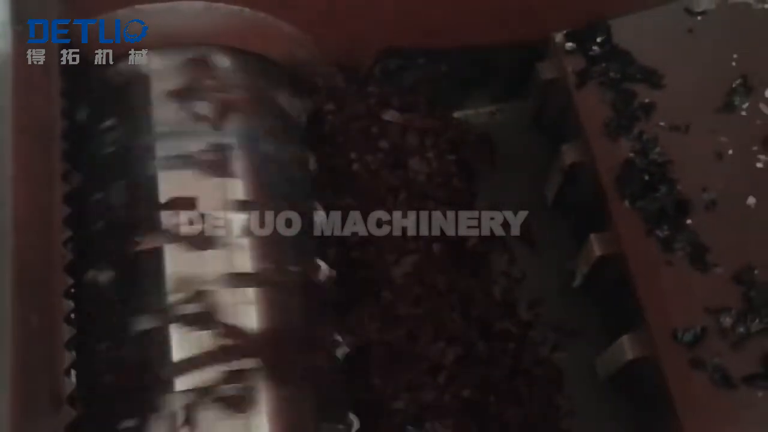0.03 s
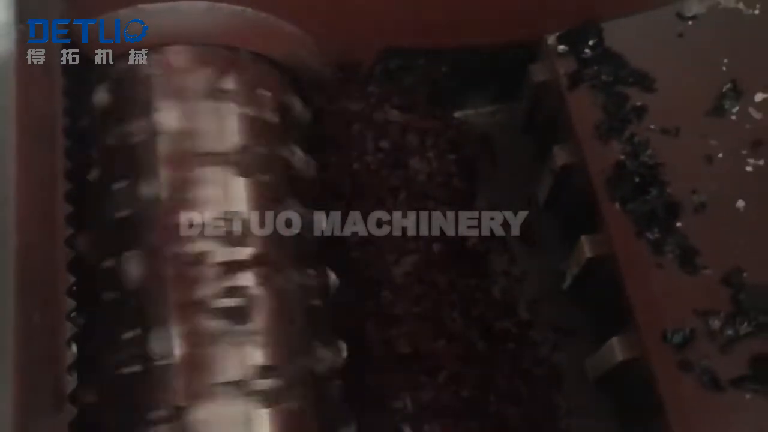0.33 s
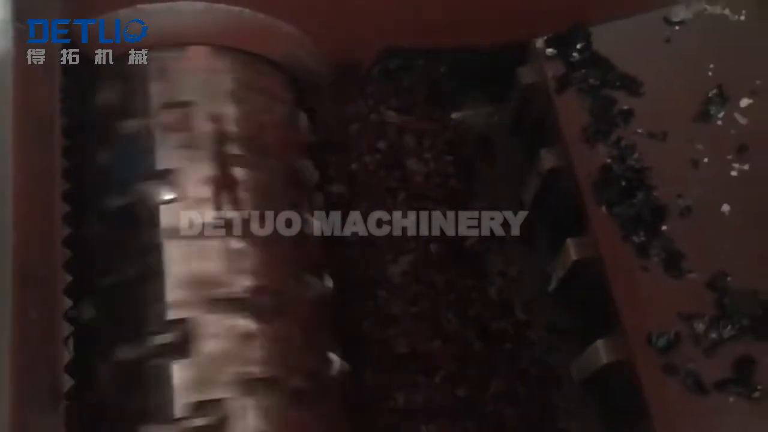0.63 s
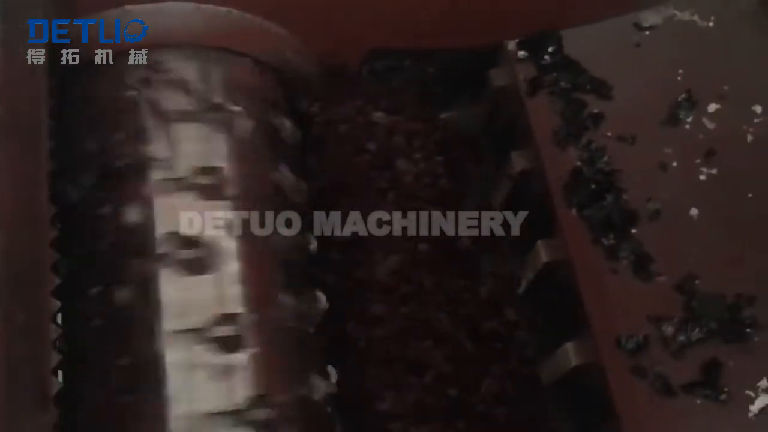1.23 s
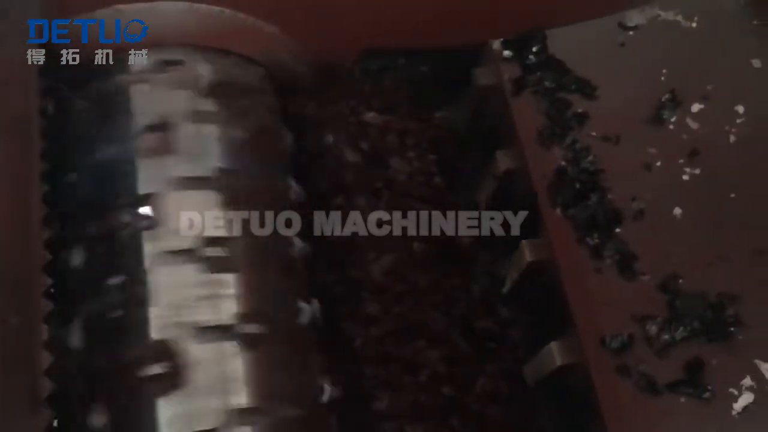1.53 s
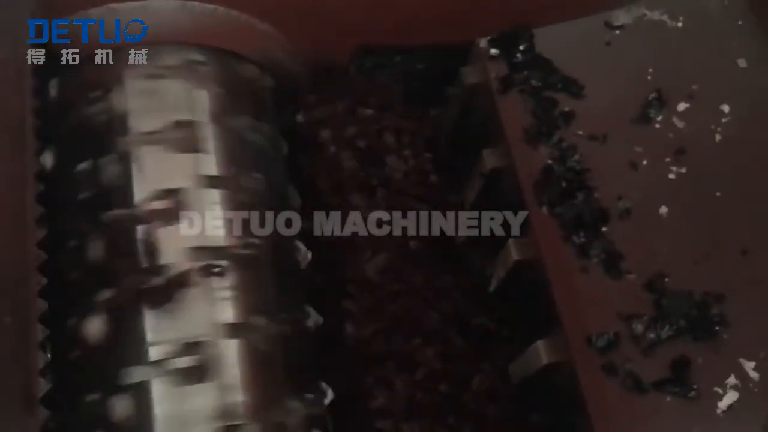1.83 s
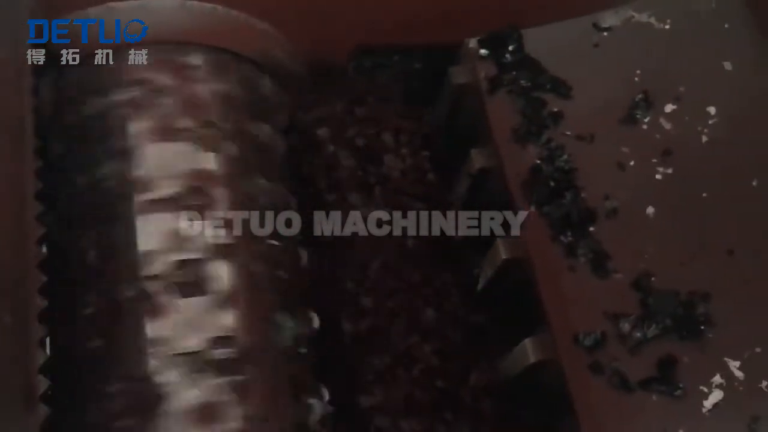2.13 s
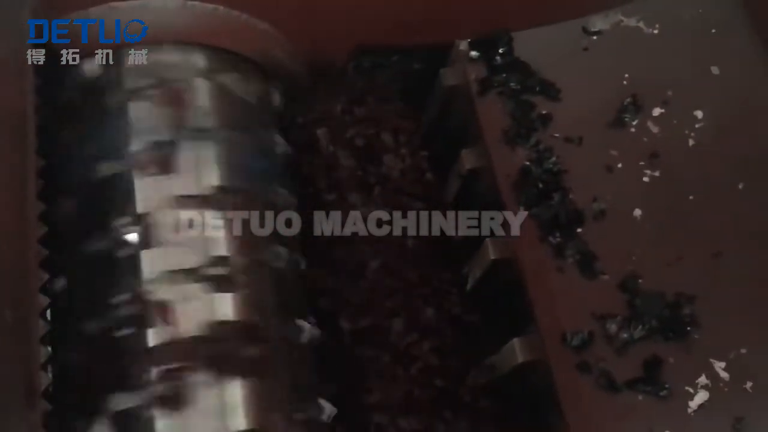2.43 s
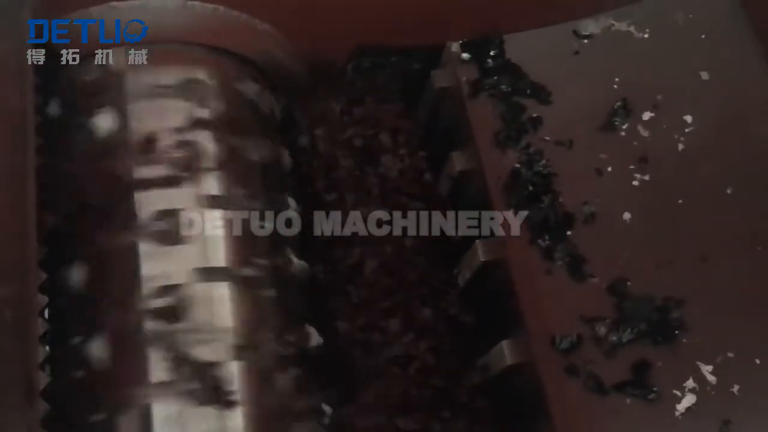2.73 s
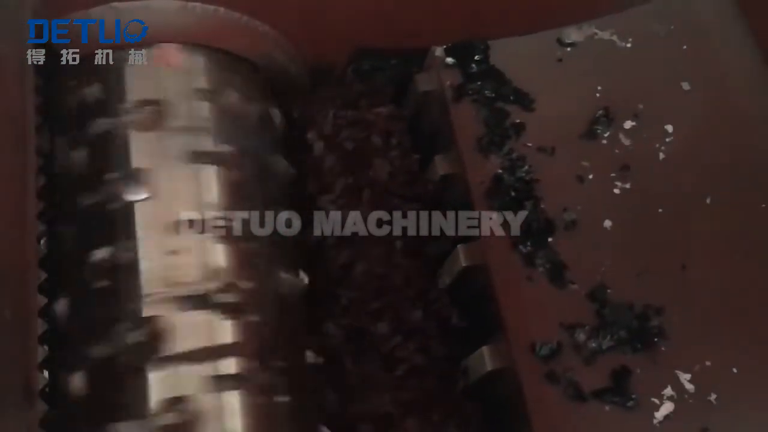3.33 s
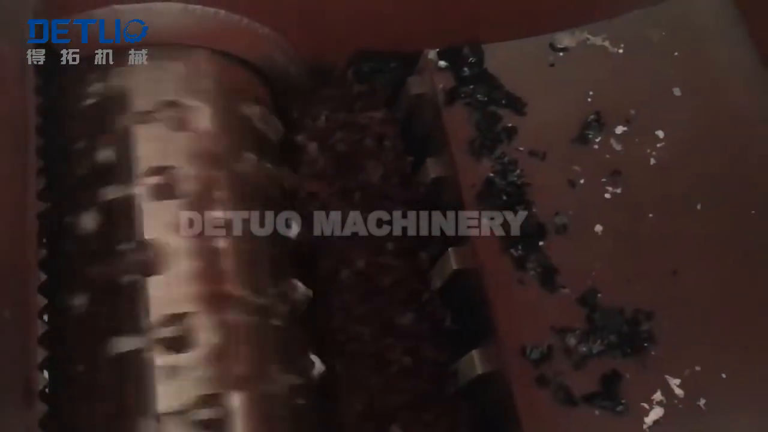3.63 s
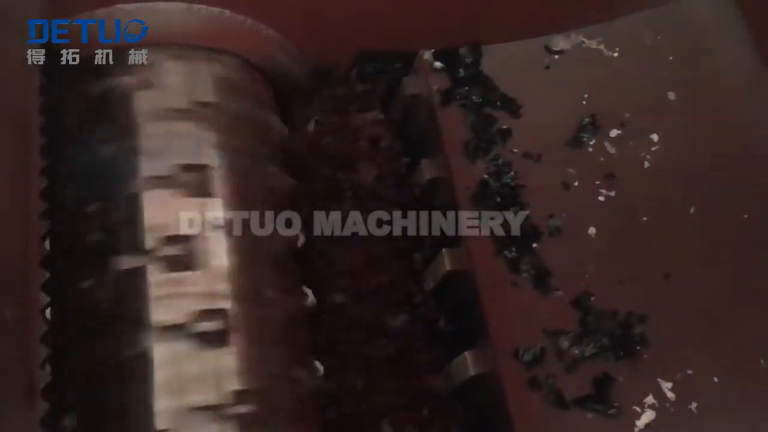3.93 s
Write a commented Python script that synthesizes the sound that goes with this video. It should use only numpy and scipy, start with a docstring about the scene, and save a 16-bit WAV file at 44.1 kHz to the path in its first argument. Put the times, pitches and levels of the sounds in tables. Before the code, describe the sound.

Shredding machine droning and whining, with loose plastic bits churning and clacking against steel.

```python
"""Just above the hopper of a single-shaft plastic shredder that runs nearly empty.
The motor pinion whines in the gearbox and the spinning rotor makes the hopper rumble and knock.
Loose plastic chips churn round the rotor in surges; now and then a bigger one clacks against the steel.
Underneath lies a bed of throbbing drive hum and the rush of the motor fan and the hall."""
import sys
import numpy as np
from scipy import signal
from scipy.fft import rfft, irfft
from scipy.io import wavfile
from scipy.ndimage import uniform_filter1d, map_coordinates

SR = 44100
rng = np.random.default_rng(int(sys.argv[2]) if len(sys.argv) > 2 else 0)


def generate_wav(sig):
    """Save sig (samples, or channels by samples) to the path in sys.argv[1] as 16-bit PCM at SR."""
    pcm = np.round(np.clip(np.atleast_2d(sig).T, -1, 1) * 32767).astype(np.int16)
    wavfile.write(sys.argv[1], SR, pcm)


N = 176400

# overtones of the tooth mesh that drift round one level (mesh multiple, level [dB])
DRIFTING_OVERTONES = [(1, -44), (3, -44), (6, -46), (8, -50), (9, -50.5), (16, -55), (19, -60), (23, -52.5),
                      (24, -68), (28, -67), (29, -75), (31, -53.5), (37, -63)]
# the strongest overtones, which swell and fade (mesh multiple)
SWELLING_OVERTONES = (2, 4, 7, 17, 18, 20)
# their envelopes (time [s], then a relative level [dB] for each swelling overtone)
SWELL_ENVELOPES = [(0, -31.5, -39.5, -39.5, -53, -43.5, -50), (.4, -30, -40.5, -60, -50, -42.5, -43.5),
                   (.7, -30, -40, -47.5, -41.5, -41, -46), (1.75, -30.5, -37.5, -42.5, -40.5, -50, -51),
                   (2.54, -29.5, -39.5, -39.5, -39, -45, -47), (2.76, -31, -41, -48, -36.5, -50, -54),
                   (4, -32, -41.5, -49, -39.5, -45, -44)]
# side tones of the pinion (frequency [Hz], level [dB])
PINION_TONES = [(931.5, -43), (1324, -53), (1888, -52), (2207, -53), (3163, -64)]
# scrape of the pinion teeth (frequency [Hz], density [dB per Hz])
SCRAPE_SPECTRUM = [(350, -73), (650, -71), (1000, -73), (2400, -83), (4500, -98.5)]
# boom, the hopper's lowest resonance (frequency [Hz], relative level [dB])
BOOM_SPECTRUM = [(55, -26), (68, -13), (80, 3.5), (87, -2.5), (105, -28)]
# swells of the boom (time [s], relative level [dB])
BOOM_ENVELOPE = [(0.0, -17), (0.16, -34), (0.46, -23), (0.69, -40), (0.80, -21), (0.91, -18), (0.98, -28),
                 (1.29, -20.5), (1.39, -34), (1.68, -21), (1.82, -34.5), (2.09, -23.5), (2.18, -47),
                 (2.27, -25), (2.44, -38), (2.57, -30.5), (2.87, -25.5), (3.15, -24), (3.61, -28.5),
                 (3.68, -24.5), (3.85, -20), (4.0, -29)]
# higher, drumming resonance of the hopper wall (frequency [Hz], relative level [dB])
DRUM_SPECTRUM = [(150, -21.5), (175, -5.5), (199, 2.5), (215, -6.5), (260, -19.5)]
# swells of the drumming (time [s], relative level [dB])
DRUM_ENVELOPE = [(0.0, -37), (0.15, -25.5), (0.27, -34), (0.72, -28), (0.83, -32), (1.15, -28.5),
                 (2.0, -37.5), (2.19, -30.5), (2.52, -32.5), (3.58, -37), (4.0, -29)]
# rumble of the rotor chamber (frequency [Hz], density [dB per Hz])
RUMBLE_SPECTRUM = [(20, -89), (40, -67), (60, -56), (100, -50), (125, -55), (160, -54), (240, -54),
                   (290, -58.5), (360, -56.5), (450, -70), (700, -82)]
# dull knocks on the hopper wall (time [s], gain [dB])
KNOCK_CUES = [(.622, -11.5), (.734, -8.5), (1.401, -11.5), (1.693, -13.5), (2.192, -13), (2.287, -11.5),
              (3.948, -11.5)]
# colour of plastic chips on steel (frequency [Hz], density [dB per Hz])
CHIP_SPECTRUM = [(500, -80), (1300, -74), (2400, -73.5), (4200, -79.5), (6200, -79), (7700, -80),
                 (9400, -78), (10400, -86), (11700, -77.5), (13500, -82), (15800, -85)]
# how hard the chips churn (time [s], relative level [dB])
CHURN_ENVELOPE = [(0.0, -36), (0.13, -44.5), (0.19, -36), (0.26, -43), (0.38, -36), (0.66, -38.5),
                  (0.88, -34.5), (1.04, -43), (1.27, -41), (1.33, -36.5), (1.38, -40.5), (1.49, -35.5),
                  (1.55, -41.5), (2.12, -34.5), (2.33, -40.5), (2.49, -32), (2.58, -37), (2.97, -42),
                  (3.4, -39.5), (3.48, -35.5), (3.63, -37), (4.0, -36)]
# bigger fragments hit the steel (time [s], gain [dB], extra body gain [dB], decay [s])
CLACK_CUES = [(0.2066, -22.5, 3, 0.0058), (.4778, -16, -10, 0.005), (.7477, -19, -17, .004),
              (.8824, -22, -7, .007), (1.1265, -23, 6, 0.004), (1.1857, -9, -6, 0.0033),
              (1.1919, -22.5, 3, 0.0085), (1.2893, -13, -18, 0.0022), (1.3055, -22, -11, .011),
              (1.3365, -21.5, 5.5, 0.0047), (1.482, -18.5, -10, 0.0036), (1.624, -19.5, -10, 0.0044),
              (1.8378, -19, -12, .002), (1.904, -20.5, -5, 0.0066), (1.998, -17, -2, 0.0061),
              (2.12, -15.5, -5, 0.0035), (2.1862, -19.5, -7, 0.01), (2.2036, -19, -3, 0.0032),
              (2.291, -27, 4, .006), (2.397, -20, -5, .005), (2.4582, -20, -11, 0.0082),
              (2.4744, -19, -6, .004), (2.4822, -21.5, 2.5, 0.0079), (2.504, -18, -6, .003),
              (2.9293, -22.5, -2, 0.0061), (3.724, -28.5, 4.5, 0.013)]
# bright snap of a clack (frequency [Hz], gain [dB])
SNAP_EQ = [(2500, -46), (6000, 5), (7500, -3), (10500, -1), (12000, -2), (15500, -2)]
# duller body of a clack (frequency [Hz], gain [dB])
BODY_EQ = [(600, -7), (1600, 3.5), (2700, -3), (4300, -2), (7000, -11)]
# hum of motor and frame (frequency [Hz], level [dB])
HUM_TONES = [(62.4, -38.5), (139.8, -42.5), (278, -45.5), (301.8, -42)]
# rush of the motor fan and the hall (frequency [Hz], density [dB per Hz])
RUSH_SPECTRUM = [(250, -76), (480, -69.5), (640, -62.5), (950, -66.5), (1500, -72), (2300, -71.5),
                 (3000, -77), (4400, -79), (4950, -83.5), (5750, -73), (7700, -85), (9400, -87.5),
                 (10400, -85), (11700, -82.5), (15500, -88)]

MESH_HZ, PINION_TEETH = 318.72, 13
WHINE_FLICKER_DB, HUM_FLICKER_DB = 0.28, 1.5
BEAT_HZ, BEAT_PEAK_S = 3.32, .12
TOP_HZ = 15750


def gear_whine(clock):
    """Meshing teeth sing a stack of overtones that wobble with each turn of the pinion."""
    mesh = MESH_HZ * clock
    shaft = mesh / PINION_TEETH
    overtones = [(order, db + 3 * wander(5.1)) for order, db in DRIFTING_OVERTONES]
    for column, order in enumerate(SWELLING_OVERTONES, start=1):
        overtones.append((order, envelope(SWELL_ENVELOPES, column) + 0.5))
    whine = 0
    for order, db in overtones:
        once_phase, twice_phase, tone_phase = rng.uniform(0, 2 * np.pi, 3)
        wobble = 0.16 * (np.cos(shaft + once_phase) + .5 * np.cos(2 * shaft + twice_phase))
        grit = 0.15 * (wander(40) + 1j * wander(40))  # roughens both level and phase
        depth = min(order / 4, 1)  # the lowest overtones are the steadiest
        tone = (1 + depth * (wobble + grit)) * np.exp(1j * (order * mesh + tone_phase))
        whine += undb(db + depth * WHINE_FLICKER_DB * wander(12)) * tone.real
    return np.sqrt(2) * whine


def pinion_scrape(clock):
    """The teeth scrape the same way on every turn of the pinion: a noise loop one turn long."""
    loop = rng.standard_normal(int(SR * PINION_TEETH / MESH_HZ))
    turns = clock / (2 * np.pi) * MESH_HZ / PINION_TEETH
    scrape = map_coordinates(loop, [turns * len(loop)], mode="grid-wrap")
    return equalise(scrape * np.sqrt(SR / 2), SCRAPE_SPECTRUM)


def hopper_rumble(clock):
    """The rotor shakes the chamber unevenly: a boom, plus drumming and rumble that chug with the beat."""
    rotor_hum = motor_tones(clock, [(75.43, 0)], HUM_FLICKER_DB)  # as strong as the boom's noise
    boom = undb(-0.5) * hopper_resonance(BOOM_SPECTRUM, BOOM_ENVELOPE, rotor_hum)
    drum = undb(-2.5) * hopper_resonance(DRUM_SPECTRUM, DRUM_ENVELOPE)
    rumble = noise(RUMBLE_SPECTRUM) * undb(1.14 * wander(14))
    chug = undb(0.95 * np.cos(beat_phase()))
    return boom + (drum + rumble) * chug


def hopper_resonance(spectrum, levels, hum=0):
    """A randomly shaken resonance, gently compressed, rides a level envelope."""
    shake = noise(spectrum)
    ring = signal.hilbert(shake / shake.std() + hum)
    compressed = ring.real / (np.abs(ring) + 0.27) ** 0.3
    return compressed / compressed.std() * undb(envelope(levels))


def wall_knocks(hz=191.6, attack_s=0.0042, decay_s=0.016):
    """Lumps caught by the rotor thump the hopper wall, which drums for a few cycles."""
    t = np.arange(N) / SR
    knocks = np.zeros(N)
    for start, db in KNOCK_CUES:
        age = np.clip(t - start, 0, 1)
        thump = undb(db) * (1 - np.exp(-age / attack_s)) * np.exp(-age / decay_s)
        knocks += thump * np.sin(2 * np.pi * hz * age)
    return knocks


def churning_chips(hits_per_s=1800, tail_s=0.011):
    """Thousands of tiny impacts, smeared by the hopper, come in surges as the rotor stirs the heap."""
    accent_db = 3.5 * np.minimum(rng.exponential(size=N), 4)
    hits = (rng.random(N) < hits_per_s / SR) * rng.choice([-1, 1], N) * undb(accent_db)
    t = np.arange(SR // 20) / SR
    tail = rng.standard_normal(len(t)) * np.exp(-t / tail_s)
    tail *= undb(1.5) / np.linalg.norm(tail)
    hits += signal.fftconvolve(hits, tail)[:N]
    surge_db = 0.73 * heap_surge() + 3 * np.tanh(wander(40))
    return equalise(hits / hits.std() * np.sqrt(SR / 2) * undb(surge_db), CHIP_SPECTRUM)


def pinging_chips(pings_per_s=100, lowest_hz=1997):
    """Single chips ring briefly, each at six pitches of its own, louder when the heap is stirred."""
    pings = np.zeros(N + SR)
    t = np.arange(SR // 25) / SR
    surge_db = heap_surge()
    for when, softness, length, *pitches in rng.random((int(pings_per_s * N / SR), 9)):
        at = int(when * N)
        hz = lowest_hz + (TOP_HZ - lowest_hz) * np.array(pitches)[:, None]
        decay_s = 0.0073 * (.5 + length)
        ring = np.sin(2 * np.pi * hz * t).mean(axis=0) * np.exp(-t / decay_s)
        pings[at:at + len(t)] += ring * undb(-25 + surge_db[at] - 17 * softness)
    return pings[:N]


def fragment_clacks(attack_s=.0005):
    """Each flung fragment gives a sharp crack and a short rattle: a bright snap over a duller body."""
    t = np.arange(N) / SR
    crack, snap_level, body_level = np.zeros((3, N))
    for start, db, body_db, decay_s in CLACK_CUES:
        age = np.clip(t - start, 0, 1)
        burst = undb(db) * (1 - np.exp(-age / attack_s)) * np.exp(-age / decay_s)
        crack[int((start + attack_s) * SR)] = -undb(db - 2)
        snap_level += burst * undb(-4.5)
        body_level += burst * undb(3 + body_db)
    rattle = undb(1.5 * wander(600))
    snap = equalise(crack + snap_level * rattle * rng.standard_normal(N), SNAP_EQ)
    body = equalise(body_level * rattle * rng.standard_normal(N), BODY_EQ)
    return snap + body


def drive_throb(clock, lower_hz=150.9):
    """Two hums a few hertz apart swell and cancel."""
    phase = lower_hz * clock + rng.uniform(0, 2 * np.pi)
    pair = undb(-32) * np.sin(phase) + undb(-32.5) * np.sin(phase + beat_phase())
    return np.sqrt(2) * pair * undb(HUM_FLICKER_DB * wander(5.02))


def motor_tones(clock, tones, flicker_db):
    """Sines locked to the motor, each wavering in level."""
    out = 0
    for hz, db in tones:
        gain = undb(db + flicker_db * wander(4.95))
        out += gain * np.sqrt(2) * np.sin(hz * clock + rng.uniform(0, 2 * np.pi))
    return out


def fan_rush():
    """The motor fan and the hall lay down an airy, lightly flickering bed."""
    return noise(RUSH_SPECTRUM) * undb(1.1 * wander(9.75))


def motor_clock(sag_per_s=0.0001994):
    """Running phase per Hz of anything geared to the motor, whose speed sags and wanders slightly."""
    t = np.arange(N) / SR
    speed = 1 + .0002 * wander(4.95) - sag_per_s * (t - t.mean())
    return 2 * np.pi * np.cumsum(speed) / SR


def beat_phase():
    """Phase of the slow beat between the two hums, a whole cycle from swell to swell."""
    return 2 * np.pi * BEAT_HZ * (np.arange(N) / SR - BEAT_PEAK_S)


def heap_surge():
    """How hard the heap is stirred, in dB around its average."""
    churn_db = envelope(CHURN_ENVELOPE)
    return churn_db - churn_db.mean()


def undb(db):
    """Decibels to gain."""
    return 10 ** (np.asarray(db) / 20)


def envelope(rows, column=1):
    """One column of a table joined by straight ramps in time."""
    rows = np.array(rows)
    return np.interp(np.arange(N) / SR, rows[:, 0], rows[:, column])


def wander(rate):
    """Smooth random modulation of spread about 1, turning about rate times a second."""
    hold = max(int(SR / rate), 2)
    steps = np.repeat(rng.standard_normal(N // hold + 3), hold)
    start = rng.integers(hold)
    return 1.35 * uniform_filter1d(uniform_filter1d(steps, hold), hold)[start:start + N]


def equalise(x, points):
    """Causal EQ through (frequency [Hz], gain [dB]) points, falling 20 dB an octave past the ends."""
    hz, db = np.array(points).T
    bin_hz = np.maximum(np.arange(N + 1) * SR / (2 * N), 1)
    octaves_out = np.maximum(np.log2(hz[0] / bin_hz), 0) + np.maximum(np.log2(bin_hz / hz[-1]), 0)
    gain = undb(np.interp(np.log(bin_hz), np.log(hz), db) - 20 * octaves_out)
    cepstrum = irfft(np.log(gain))
    cepstrum[1:N] *= 2  # fold to minimum phase, so nothing rings ahead of a hit
    cepstrum[N + 1:] = 0
    return irfft(rfft(x, 2 * N) * np.exp(rfft(cepstrum)))[:N]


def noise(spectrum):
    """Noise with a spectrum given in dB per Hz."""
    return equalise(rng.standard_normal(N) * np.sqrt(SR / 2), spectrum)


def scene():
    """Drive, hopper and plastic in one mono mix."""
    clock = motor_clock()
    whine = gear_whine(clock) + motor_tones(clock, PINION_TONES, WHINE_FLICKER_DB) + pinion_scrape(clock)
    bed = motor_tones(clock, HUM_TONES, HUM_FLICKER_DB) + drive_throb(clock) + fan_rush()
    hopper = hopper_rumble(clock) + wall_knocks()
    plastic = churning_chips() + pinging_chips() + fragment_clacks()
    return (whine + hopper + plastic + bed)[None]


def record(dry):
    """A steep low-pass trims the top of the mix."""
    return signal.sosfilt(signal.ellip(12, .1, 90, TOP_HZ, fs=SR, output="sos"), dry)


dry = scene()
out = record(dry)
generate_wav(out)
```